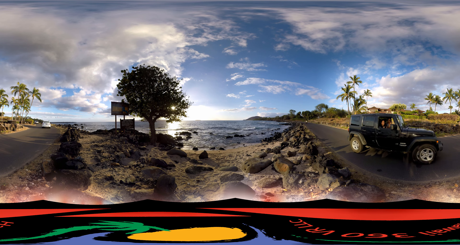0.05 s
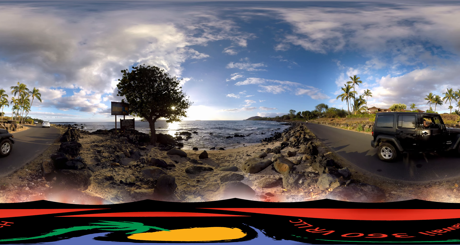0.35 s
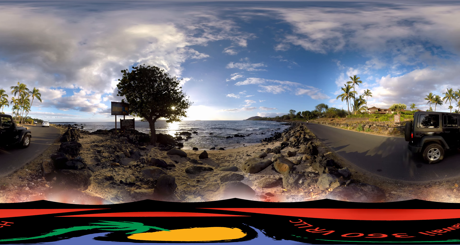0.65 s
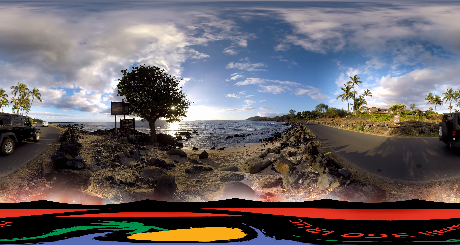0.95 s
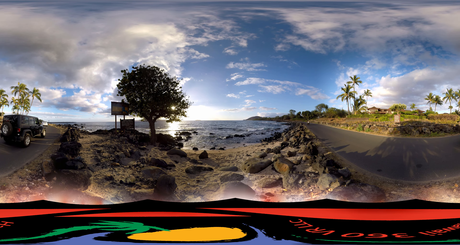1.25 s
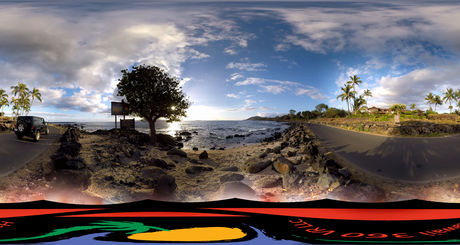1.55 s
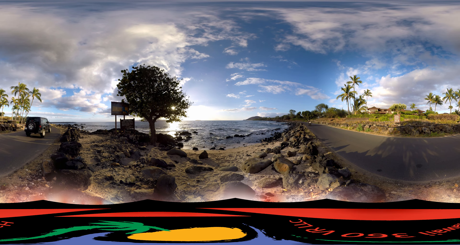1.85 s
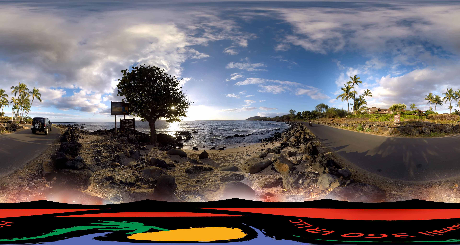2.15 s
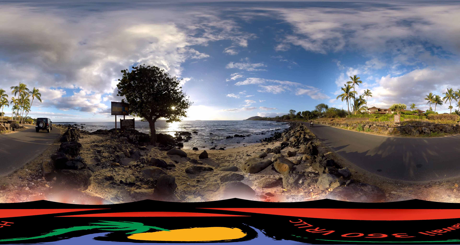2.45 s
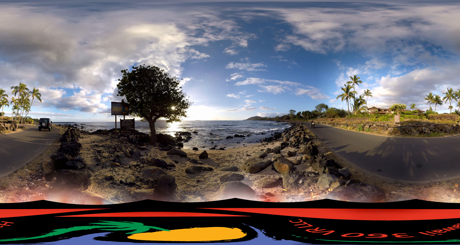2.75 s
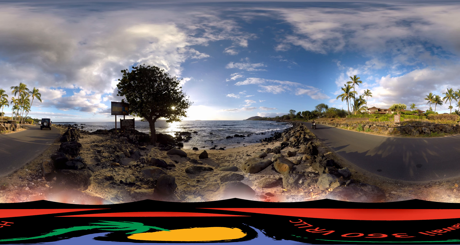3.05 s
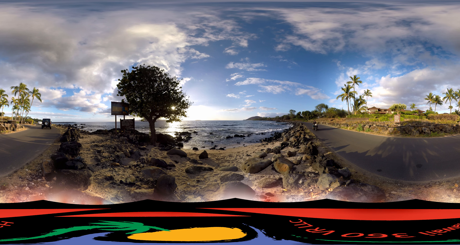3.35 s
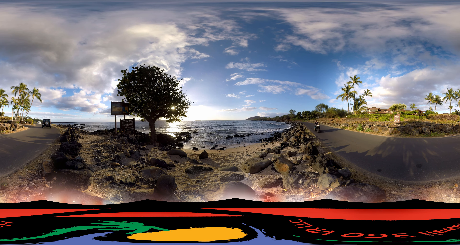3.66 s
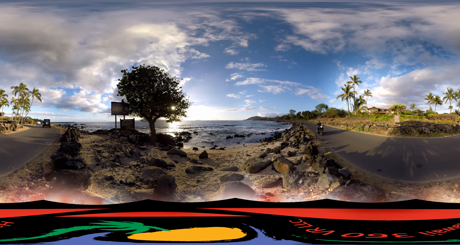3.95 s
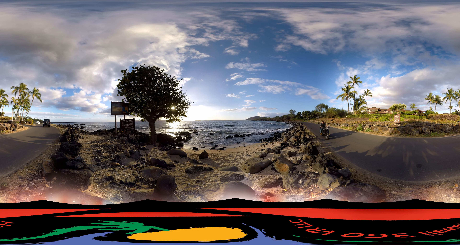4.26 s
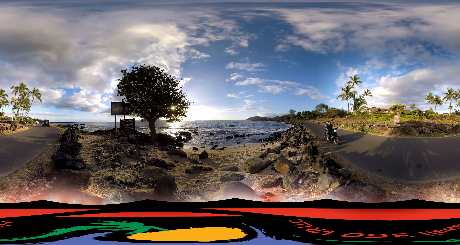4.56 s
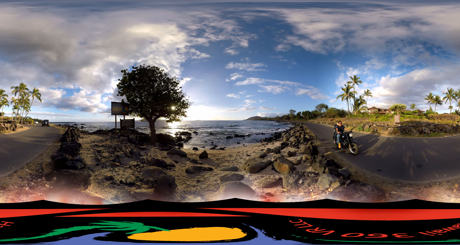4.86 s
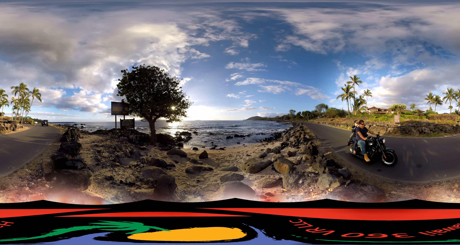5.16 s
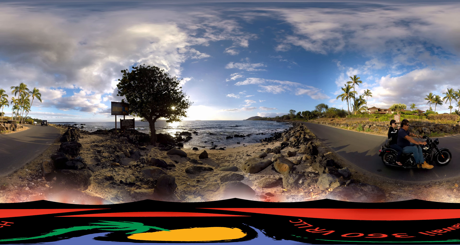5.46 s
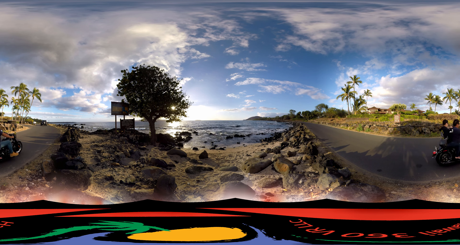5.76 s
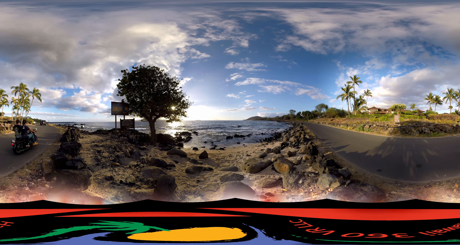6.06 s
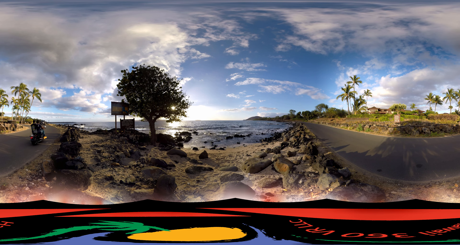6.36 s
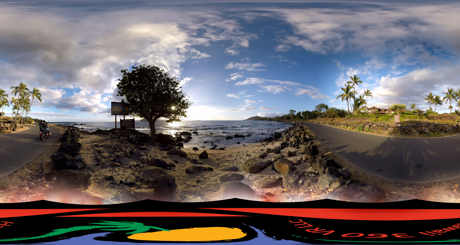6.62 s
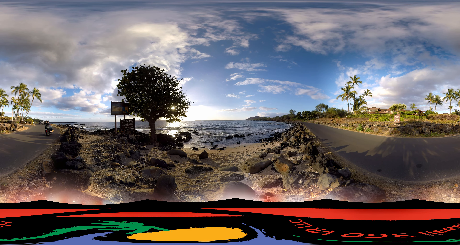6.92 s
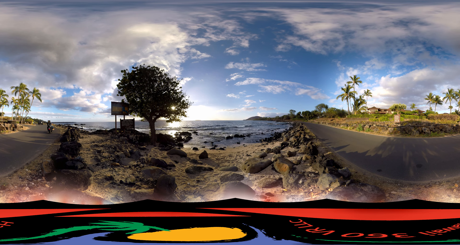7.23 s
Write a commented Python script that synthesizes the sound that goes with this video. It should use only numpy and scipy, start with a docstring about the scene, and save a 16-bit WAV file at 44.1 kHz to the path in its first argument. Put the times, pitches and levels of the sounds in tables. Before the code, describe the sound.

Wind buffets the microphone and surf hisses as a car rushes off, then a motorcycle cruises by with a lumpy, crackling exhaust.

```python
"""A shore road, heard from the rocks: a V-twin motorcycle cruises past, close by.
Surf lays a bed of hiss, gusts buffet the microphone, and a car ahead rushes off on its tyres.
The bike's two unevenly spaced firings ring the exhaust pipes; once it is past, the pipe mouths
face the listener, spitting and cracking as the throttle opens. Gain control ducks the loud pass."""
import sys
import numpy as np
from scipy import signal
from scipy.fft import rfft, irfft, next_fast_len
from scipy.io import wavfile
from scipy.ndimage import uniform_filter1d, minimum_filter1d, map_coordinates

SR = 44100
rng = np.random.default_rng(int(sys.argv[2]) if len(sys.argv) > 2 else 0)


def wrap_up_sound(samples):
    """Save the sound to the file named by the first command line argument, as 16-bit audio."""
    columns = np.atleast_2d(samples).T
    # keep every value between -1 and 1, then stretch to whole-number steps
    tamed = np.clip(columns, -1, 1)
    steps = np.round(tamed * 32767).astype(np.int16)
    wavfile.write(sys.argv[1], SR, steps)


N = 330309
TIME = np.arange(N) / SR
PASS_S, LANE_M, RIDE_M_PER_S, SOUND_M_PER_S = 5.5, 4, 9, 343
CRUISE_HZ = 13  # engine cycles a second, two revolutions each
FRONT_AT, REAR_AT = 0.4815, 0.9086  # where in the cycle each cylinder fires


def amp(db):
    """Decibels to gain."""
    return 10 ** (np.asarray(db) / 20)


def unit(x):
    """Scale to rms 1."""
    return x / np.sqrt(np.mean(x ** 2) + 1e-20)


def automation(points):
    """A value for every sample, ramping between (time, value) points."""
    return np.interp(TIME, *np.transpose(points))


def wobble(rate):
    """A smooth random curve, rate knots a second."""
    return map_coordinates(rng.standard_normal(int(N * rate / SR) + 4), [TIME * rate])


def swell(peak_s, half_s):
    """A bell-shaped fade in and out."""
    return np.exp(-((TIME - peak_s) / half_s) ** 2 / 2)


def filtered(x, response):
    """x through a complex frequency response."""
    size = next_fast_len(len(x) + SR // 2)
    return irfft(rfft(x, size) * response(np.fft.rfftfreq(size, 1 / SR)), size)[:len(x)]


def coloured(x, eq):
    """x through an EQ curve, then scaled to rms 1: EQ levels are relative."""
    hz, db = np.transpose(eq)
    return unit(filtered(x, lambda f: amp(np.interp(np.log(f + 1), np.log(hz), db))))


def noise(eq):
    """Steady coloured noise at rms 1."""
    return coloured(rng.standard_normal(N), eq)


def split(x, edge_hz, order):
    """A crossover: lows and highs, each at rms 1."""
    low = filtered(x, lambda f: 1 / (1 + (f / edge_hz) ** order))
    return unit(low), unit(x - low)


# The wash of the shore: f/Hz, level/dB
SHORE_EQ = [(120, 12), (400, 9.5), (800, 4.5), (1000, 2), (1250, 3), (1700, -1.5), (2700, -4.5), (3900, -8),
            (4700, -7), (5800, -14), (8000, -18.5), (10000, -22.5), (13000, -25), (15300, -31)]
def shore():
    """A steady bed of surf and road hiss with a fine splashing grain."""
    grain = amp(0.78 * wobble(700) + 0.42 * wobble(25))
    wash = coloured(grain * rng.standard_normal(N), SHORE_EQ)
    hiss, air = split(wash, edge_hz=4830, order=6)
    return amp(-33.5) * hiss + amp(-49) * air


# Wind rumble: f/Hz, level/dB
WIND_EQ = [(8, 5), (20, -2), (42, 2), (70, 8.5), (110, 2.5), (200, -5.5), (400, -20), (1000, -76),
           (3000, -90)]
# Gust cues: t/s, relative peak level/dB, half length/s
GUST_CUES = [(0.068, -26.5, 0.076), (0.284, -20, 0.016), (0.362, -21.5, 0.04), (0.526, -20, 0.098),
             (0.77, -23, 0.054), (1.365, -25.5, 0.073), (1.583, -22, 0.062), (2.044, -24.5, 0.19),
             (3.057, -23.5, 0.08), (3.489, -29, 0.15), (4.642, -28, 0.083), (6.528, -21.5, 0.078)]
def wind():
    """A breeze and lumpy gusts buffet the microphone; the stronger ones are brighter."""
    breeze = amp(-28 + 0.5 * wobble(4.1))
    gusts = [amp(db) * swell(s, half_s) for s, db, half_s in GUST_CUES]
    buffet_db = 20 * np.log10(np.max([breeze, *gusts], axis=0))
    lumps = amp(1.3 * wobble(22))
    rumble = coloured(lumps * rng.standard_normal(N), WIND_EQ)
    thump, flutter = split(rumble, edge_hz=54, order=4)
    return amp(buffet_db + 5) * thump + amp(1.165 * buffet_db + 6.5) * flutter


# The car's tyre rush: f/Hz, level/dB
CAR_EQ = [(200, 4.5), (450, -2), (900, 1.5), (1500, 1), (2400, -0.5), (3500, -4), (4500, -33), (6000, -20),
          (12000, -36)]
# The low whoosh of its wake: f/Hz, level/dB
WAKE_EQ = [(40, -14), (130, 6), (300, -7.5), (550, -18), (1200, -40), (5000, -90)]
def car(pass_s=0.13, near_s=0.99):
    """A car's tyres rush by and fade down the road; its wake whooshes over the microphone."""
    tyres = amp(-40) * noise(CAR_EQ) / np.hypot(1, (TIME - pass_s) / near_s)
    wake = amp(-19.5) * swell(peak_s=0.552, half_s=0.023) * noise(WAKE_EQ)
    return tyres + wake


def bike_position():
    """Distance in metres, and heading: -1 head on, 1 heard from straight behind."""
    along = RIDE_M_PER_S * (TIME - PASS_S)
    distance = np.hypot(LANE_M, along)
    return distance, along / distance


# The rider rolls off while passing, then opens up: t/s, throttle (0 cruising, -1 shut)
THROTTLE_MOVES = [(4.4, 0.026), (5.1, 0.088), (5.55, -0.31), (5.8, -0.67), (6.52, -0.31), (6.62, -0.18),
                  (7.49, 0.35)]
def fader(abreast_db, loss_db, behind_db, throttle_db):
    """One bike layer's gain: loss per tenfold distance, lift per unit of heading and throttle."""
    distance, heading = bike_position()
    pass_db = abreast_db - loss_db * np.log10(distance / LANE_M) + behind_db * heading
    return amp(pass_db + throttle_db * automation(THROTTLE_MOVES))


# Front tyre hiss: f/Hz, level/dB
TREAD_EQ = [(1000, -3), (2800, 0.5), (4000, -5.5), (4800, -0.5), (5700, -8.5), (8000, -10.5),
            (14000, -21.5), (15300, -25)]
def tread():
    """The front tyre throws its hiss forward, so it is heard on the approach."""
    return fader(abreast_db=-52, loss_db=29.5, behind_db=-27.5, throttle_db=5) * noise(TREAD_EQ)


def puffs(crank, at, life_s, scatter_db):
    """Noise that bursts once a cycle and dies away, each burst at a new size."""
    cycle, phase = np.divmod(crank - at + 1, 1)
    sizes = amp(scatter_db * rng.standard_normal(int(cycle[-1]) + 1))
    return sizes[cycle.astype(int)] * np.exp(-phase / CRUISE_HZ / life_s) * rng.standard_normal(N)


# Valve clatter: f/Hz, level/dB
VALVE_EQ = [(300, -8), (600, 13.5), (1200, 5), (1900, 6), (3000, -11.5), (4700, -8.5), (6000, -30),
            (14000, -55)]
# The bike's tyres up close: f/Hz, level/dB
TYRE_EQ = [(500, 22.5), (1200, 8), (2000, 0), (3500, 1), (4700, -1), (5800, -4.5), (7500, -5.5),
           (10000, -18), (15000, -43)]
def running_gear(crank, nearest_s, arrive_s, leave_s):
    """Valves tick four times a cycle and tyres sizzle, heard only while the bike is close."""
    ticks = sum(puffs(crank, FRONT_AT + at, life_s=0.011, scatter_db=2.5) for at in np.arange(4) / 4)
    offset = (TIME - nearest_s) / np.where(TIME < nearest_s, arrive_s, leave_s)
    return (amp(-28.5) * coloured(ticks, VALVE_EQ) + amp(-25.5) * noise(TYRE_EQ)) / (1 + offset ** 4)


# Throaty gas rasp: f/Hz, level/dB
RASP_EQ = [(150, -10), (350, 17), (650, 9.5), (880, -12.5), (1150, 4.5), (1600, -13), (2200, -52),
           (4500, -16.5), (12000, -71)]
# Bright gas spit: f/Hz, level/dB
SPIT_EQ = [(600, -20), (1500, 8), (2500, 18), (3800, 14.5), (5000, 4), (6500, -16), (10200, -25),
           (15000, -30)]
def gas_jet(crank):
    """Gas leaves the pipes with a sharp spit and a longer turbulent rasp."""
    def firings(life_s):
        return sum(puffs(crank, at, life_s, scatter_db=1.5) for at in (FRONT_AT, REAR_AT))

    # some turbulence lasts from one firing to the next
    turbulence = unit(firings(life_s=0.086)) + amp(-5.5) * rng.standard_normal(N)
    rasp = fader(-16.5, 35, 4, 27) * coloured(turbulence, RASP_EQ)
    spit = fader(-36, 23.5, 2.5, 16) * coloured(firings(life_s=0.032), SPIT_EQ)
    return rasp + spit


def burst(kicks, eq, life_s, attack_s=0.00049):
    """A snap of coloured noise at every kick."""
    t = np.arange(SR // 20) / SR
    envelope = np.exp(-t / life_s) * (1 - np.exp(-t / attack_s))
    return signal.fftconvolve(kicks, envelope)[:N] * noise(eq)


# A pop's hard edge: f/Hz, level/dB
CRACK_EQ = [(1200, -38), (2800, 4), (3900, 12.5), (4400, 4), (5200, 3.5), (6500, -25), (9000, -26),
            (15000, -45)]
# Its fizzy top: f/Hz, level/dB
SIZZLE_EQ = [(4000, -35), (7500, -4), (9000, -7), (10100, -2), (11500, -10), (15000, -18)]
# Its midrange body: f/Hz, level/dB
SMACK_EQ = [(250, -9), (600, 9.5), (900, -3), (1250, 0.5), (1800, -3.5), (2800, -32), (6000, -50)]
# Accented pops: t/s, then added level/dB for crack, sizzle and smack
POP_ACCENTS = [(4.688, 0, 0, 7), (4.987, 4, 0, 10.5), (5.061, 0, 0, 3), (5.286, 0, 0, 7), (5.592, 4, 0, 17),
               (5.636, 1, 14, 13.5), (5.747, 5, 2, 18), (6.584, 5, 1, 3), (6.619, 7, 2, 4),
               (6.662, 5, 5, -1), (6.696, 9, 1, 4), (6.741, 0, 6, -10), (6.823, 7, 8, -7), (6.857, 6, 0, 0),
               (6.903, 1, 7, 1), (7.019, 5, -2, 4), (7.065, 0, 5, -4), (7.147, 3, 6, 4),
               (7.181, 6.5, 10, 13), (7.309, 5, 6, 9.5), (7.344, 3, 0, 10), (7.391, 0, 5, 5.5),
               (7.426, -4, 8, 12)]
def pops(crank, lead_cycles=0.036, rear_db=-4.5, scatter_db=2.5):
    """Each firing cracks out of its pipe just before its boom, loudest from behind and on throttle."""
    cycles = np.arange(int(crank[-1]) + 1)
    marks = (cycles[:, None] + [FRONT_AT, REAR_AT]).ravel() - lead_cycles
    size_db = np.tile([0, rear_db], len(cycles)) + scatter_db * rng.standard_normal(len(marks))
    starts = np.searchsorted(crank, marks)
    extra_db = np.zeros((len(marks), 3))
    for s, *accent_db in POP_ACCENTS:  # the nearest pop moves onto the cue
        nearest = np.argmin(np.abs(starts / SR - s))
        starts[nearest], extra_db[nearest] = round(s * SR), accent_db
    kicks = [np.bincount(starts, amp(size_db + db), N)[:N] for db in extra_db.T]
    crack = burst(kicks[0], CRACK_EQ, life_s=0.003)
    sizzle = amp(-10.5) * burst(kicks[1], SIZZLE_EQ, life_s=0.0018)
    smack = burst(kicks[2], SMACK_EQ, life_s=0.0054)
    return fader(-36.5, 24, 19.5, 14) * (crack + sizzle) + fader(-21.5, 21, 3.5, 17) * smack


def pipe(f, modes, view):
    """A pipe's resonances from ahead (view 0) or behind (1); successive modes alternate in sign."""
    return sum(-(-1) ** k * amp(levels[view]) * 1j * f * width / (hz * hz - f * f + 1j * f * width)
               for k, (hz, width, *levels) in enumerate(modes))


def registers(tone):
    """The muffled exhaust note as boom, throb, bark and snarl, each at rms 1."""
    muffled, _ = split(tone, edge_hz=1180, order=8)
    low, high = split(muffled, edge_hz=175.6, order=14)
    return [*split(low, edge_hz=81, order=16), *split(high, edge_hz=319, order=12)]


# Front pipe modes at cruising speed: f/Hz, width/Hz, relative level/dB from ahead and from behind
FRONT_MODES = [(62.0, 12.0, -13.0, -17.0), (92.0, 12.0, -19.0, -17.0), (315.0, 12.0, -48.0, -34.0),
               (289.0, 55.0, -27.0, -49.0), (370.0, 55.0, -33.0, -41.0), (380.0, 14.0, -28.0, -38.0),
               (496.0, 36.0, -27.0, -46.0), (499.0, 29.0, -27.0, -41.0), (557.0, 23.0, -42.0, -61.0),
               (674.0, 52.0, -43.0, -59.0), (686.0, 12.0, -41.0, -55.0)]
# Rear pipe modes at cruising speed: f/Hz, width/Hz, relative level/dB from ahead and from behind
REAR_MODES = [(62, 12, -20, -25), (92, 14, -38, -31), (145, 12, -16, -17), (150, 23, -14, -16),
              (161, 12, -16, -18), (184, 12, -25, -33), (244, 12, -25, -30), (226, 12, -21, -44),
              (292, 55, -62, -37), (445, 12, -36, -50), (552, 14, -42, -50)]
def exhaust(crank, scatter_db=0.6, jitter_s=0.00018, waver_db=0.6, turn_s=5.42, turn_half_s=0.061):
    """Each firing rings its own pipe; the colour turns as the pipe mouths come into view."""
    count = int(crank[-1]) + 4
    length = int((count + 2) * SR / CRUISE_HZ)
    tones = np.zeros((2, length))  # from ahead, from behind
    for at, modes in ((FRONT_AT, FRONT_MODES), (REAR_AT, REAR_MODES)):
        size, late = rng.standard_normal((2, count))
        starts_s = (np.arange(count) + at) / CRUISE_HZ + jitter_s * late
        pulses = np.bincount((starts_s * SR).astype(int), amp(scatter_db * size), length)
        tones += [filtered(pulses, lambda f: pipe(f, modes, view)) for view in range(2)]
    playhead = (crank + 2) * SR / CRUISE_HZ  # varispeed: revs and Doppler shift bend the note
    turned = (1 + np.tanh((TIME - turn_s) / turn_half_s)) / 2
    faders = (fader(-10, 10, 0.5, 4.5),  # boom
              fader(-9.5, 16.5, 3.5, 4.5),  # throb
              fader(-10.5, 25, 0.75, 7),  # bark
              fader(-18.5, 31, 1, 12.5))  # snarl
    note = np.zeros(N)
    for gain, *views in zip(faders, registers(tones[0]), registers(tones[1])):
        ahead, behind = (map_coordinates(view, [playhead], order=1) for view in views)
        waver = amp(waver_db * wobble(2 * CRUISE_HZ))
        note += gain * waver * ((1 - turned) * ahead + turned * behind)
    return note


# The revs slowly sag: t/s, engine cycle f/Hz
REVS = [(0, 14.146), (2, 13.368), (4.5, 13.228), (5.6, 13.025), (5.9, 13.05), (6.55, 12.79), (6.9, 12.74),
        (7.49, 12.381)]
def scene():
    """The mono mix; the engine layers follow the crank, heard fast on approach and slow once past."""
    _, heading = bike_position()
    doppler = 1 - heading * RIDE_M_PER_S / SOUND_M_PER_S
    crank = np.cumsum(automation(REVS) * doppler) / SR  # counts engine cycles
    engine = exhaust(crank) + gas_jet(crank) + pops(crank)
    bike = engine + running_gear(crank, nearest_s=5.45, arrive_s=0.47, leave_s=0.38) + tread()
    return (bike + car() + shore() + wind())[None]


def gain_control(x, threshold_db=-10.5, recover_db_per_s=0.84):
    """The gain ducks at once when it gets loud, and creeps back."""
    level_db = 10 * np.log10(np.abs(uniform_filter1d(x ** 2, size=6600)) + 1e-12)
    excess_db = np.maximum(level_db - threshold_db, 0)
    recovered_db = recover_db_per_s * TIME
    return x * amp(recovered_db - np.maximum.accumulate(excess_db + recovered_db))


def record(dry):
    """Gain control ducks the pass, a limiter holds the hardest thumps, and filters trim both ends."""
    ceiling, low_cut_hz, top_hz = 0.74, 19, 15300
    ducked = gain_control(dry[0])
    needed = np.minimum(1, ceiling / (np.abs(ducked) + 1e-9))
    limited = ducked * uniform_filter1d(minimum_filter1d(needed, size=900), size=800)
    return filtered(limited, lambda f: (f < top_hz) * (1 - 1 / (1 + (f / low_cut_hz) ** 10)))[None]


dry = scene()
out = record(dry)
wrap_up_sound(out)
```